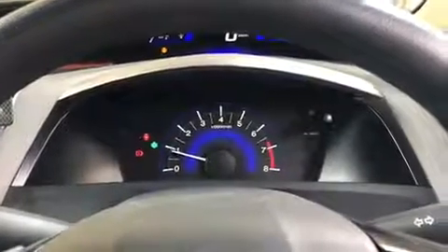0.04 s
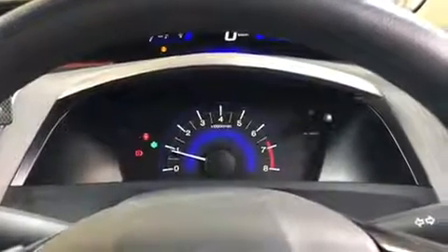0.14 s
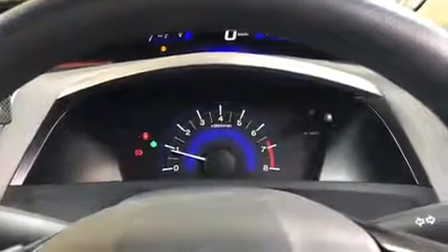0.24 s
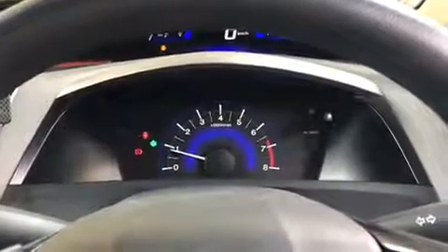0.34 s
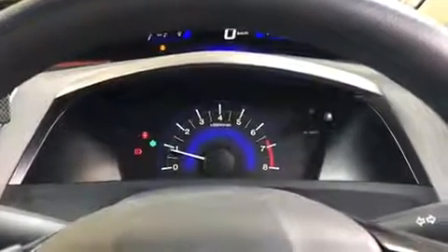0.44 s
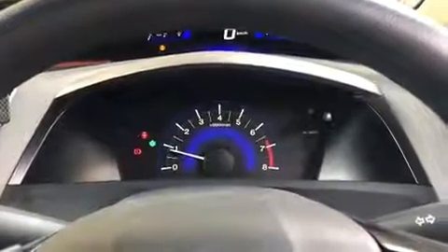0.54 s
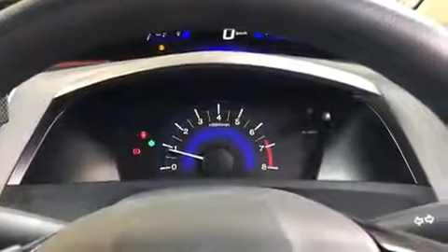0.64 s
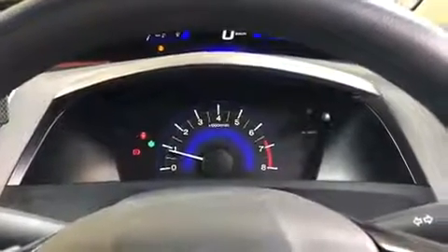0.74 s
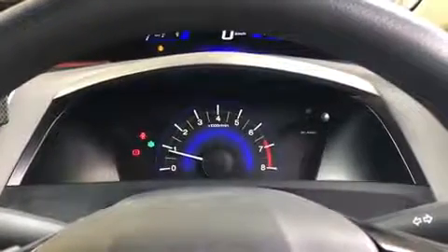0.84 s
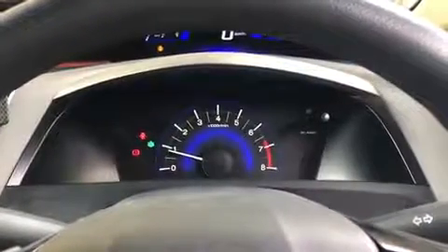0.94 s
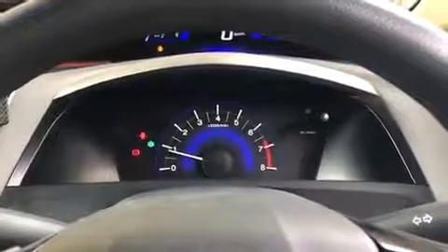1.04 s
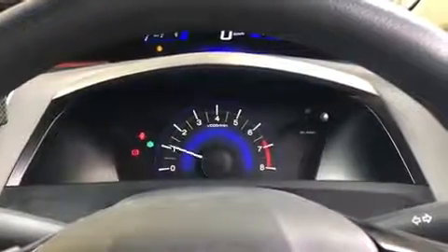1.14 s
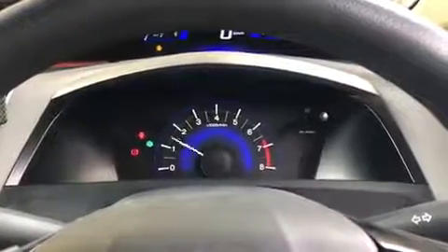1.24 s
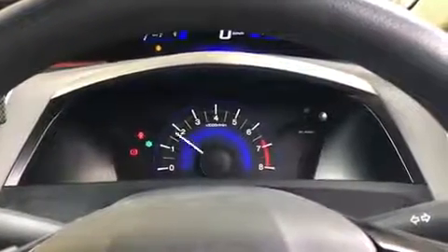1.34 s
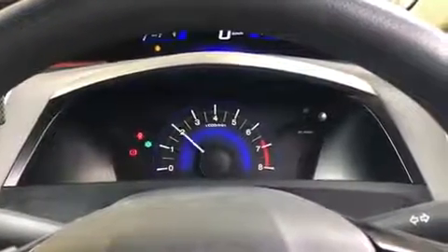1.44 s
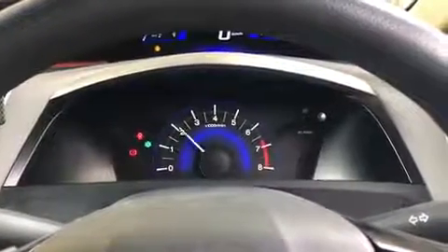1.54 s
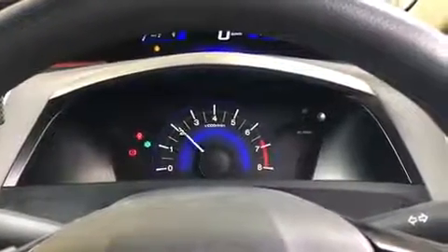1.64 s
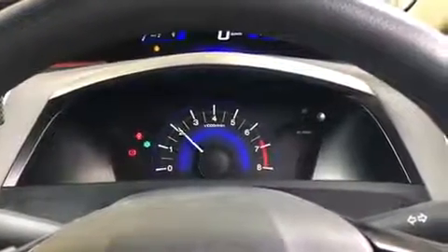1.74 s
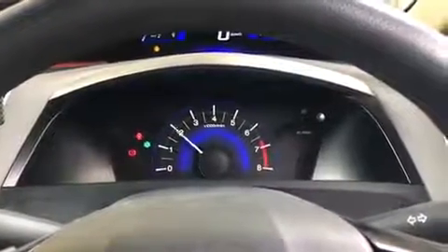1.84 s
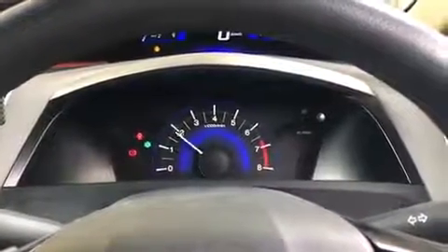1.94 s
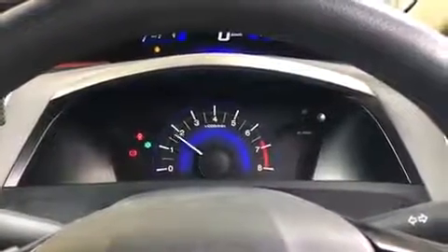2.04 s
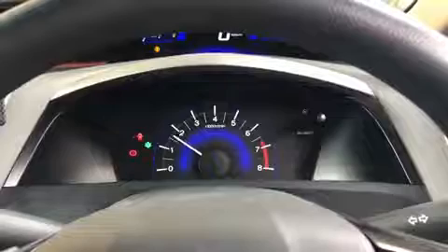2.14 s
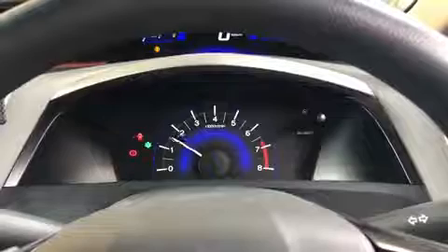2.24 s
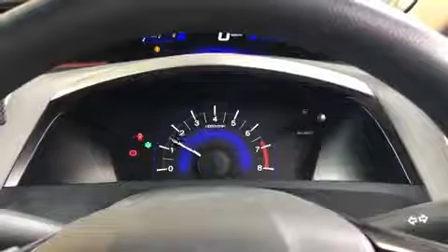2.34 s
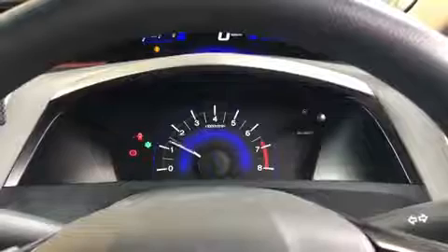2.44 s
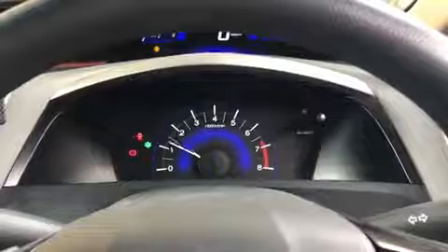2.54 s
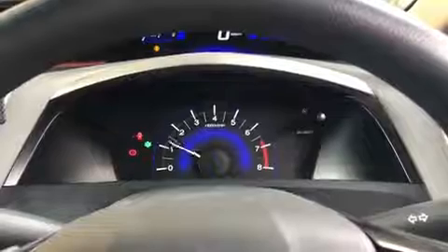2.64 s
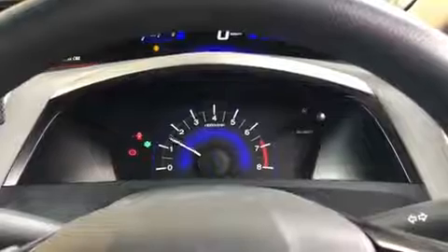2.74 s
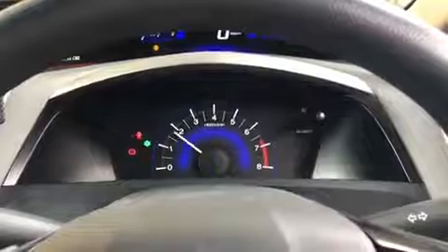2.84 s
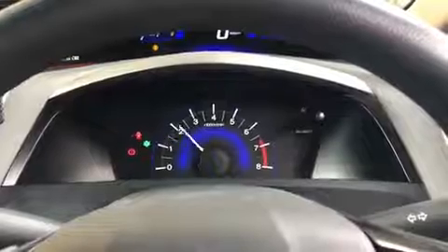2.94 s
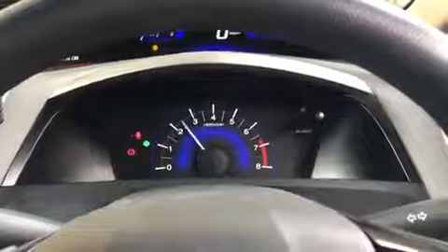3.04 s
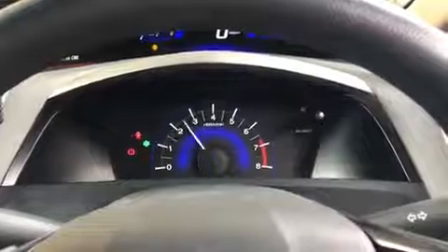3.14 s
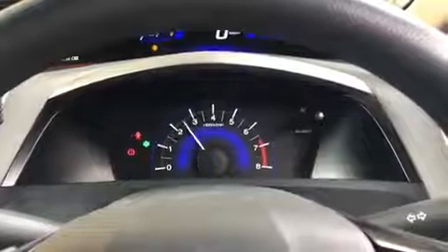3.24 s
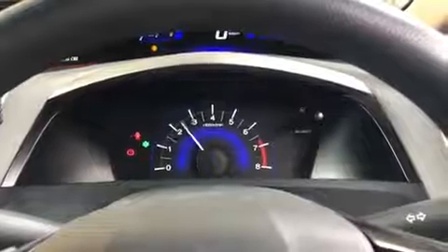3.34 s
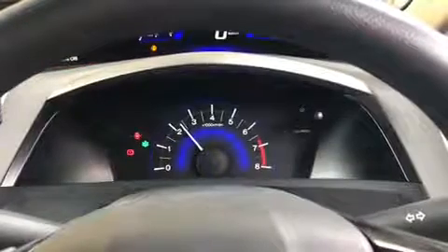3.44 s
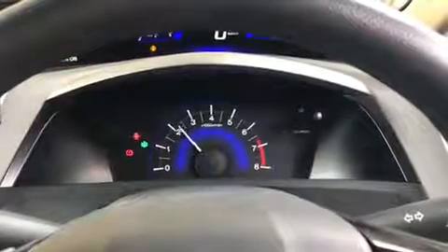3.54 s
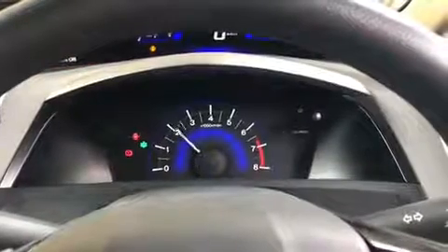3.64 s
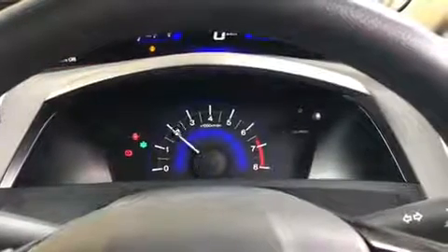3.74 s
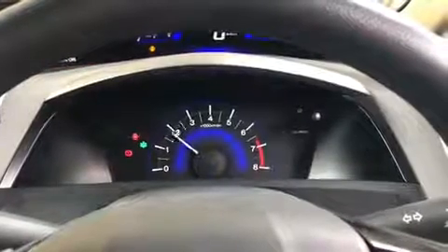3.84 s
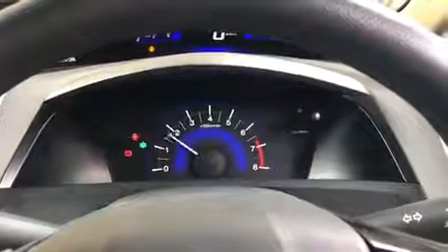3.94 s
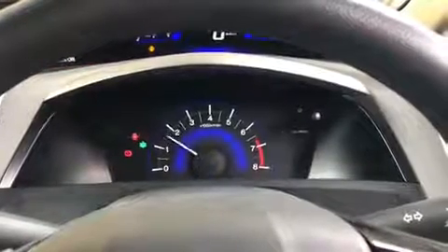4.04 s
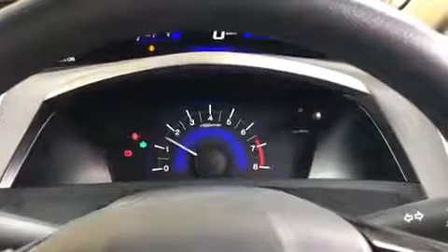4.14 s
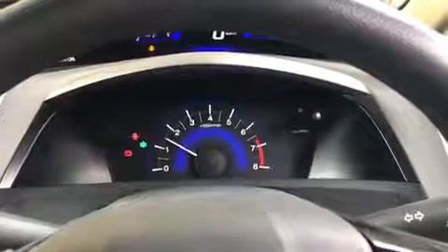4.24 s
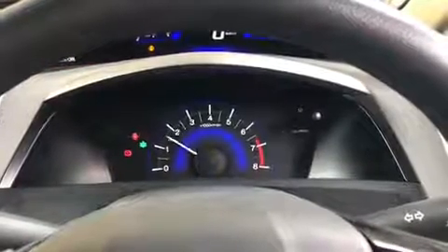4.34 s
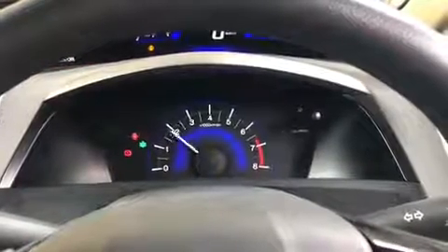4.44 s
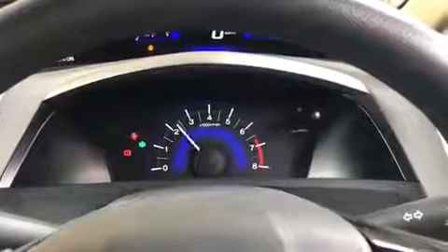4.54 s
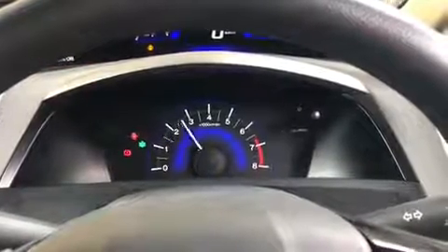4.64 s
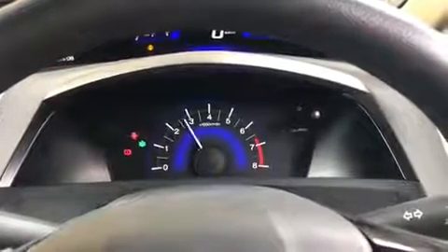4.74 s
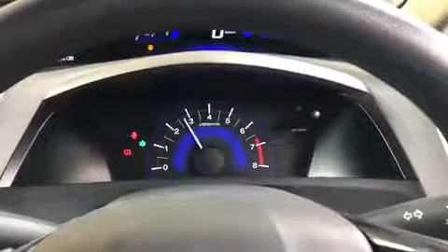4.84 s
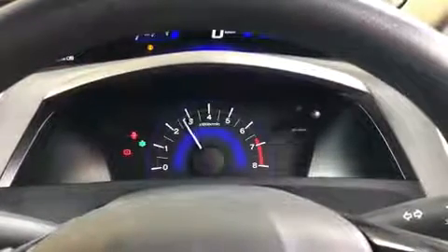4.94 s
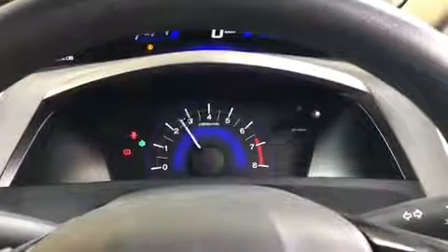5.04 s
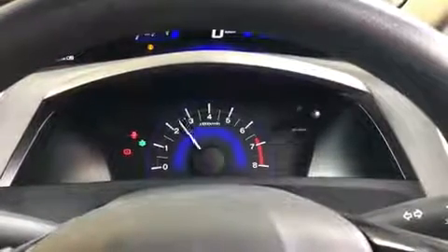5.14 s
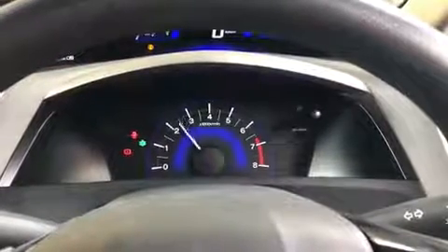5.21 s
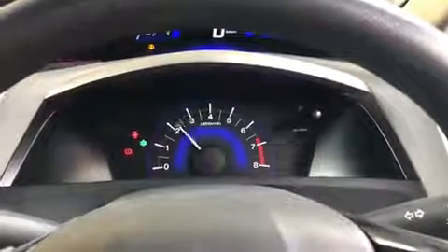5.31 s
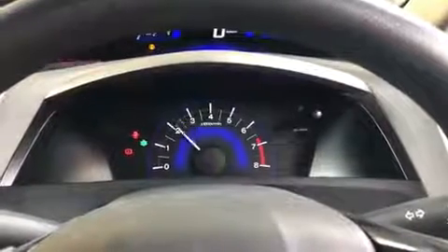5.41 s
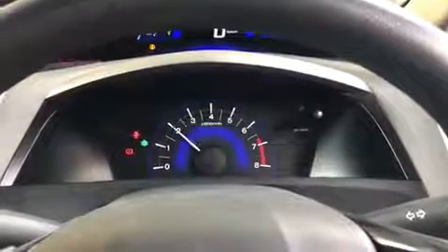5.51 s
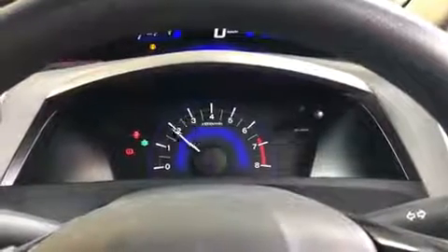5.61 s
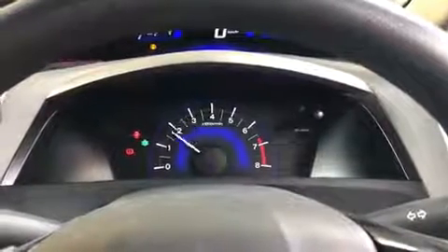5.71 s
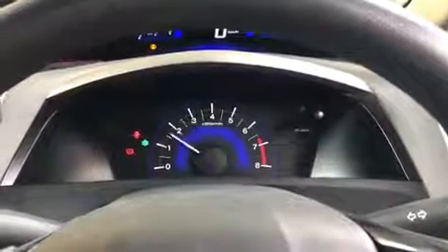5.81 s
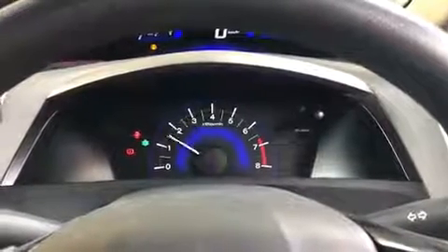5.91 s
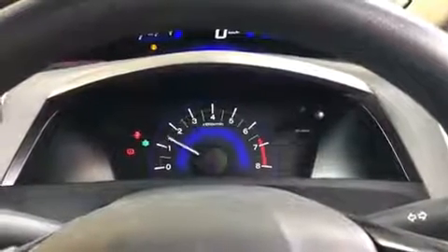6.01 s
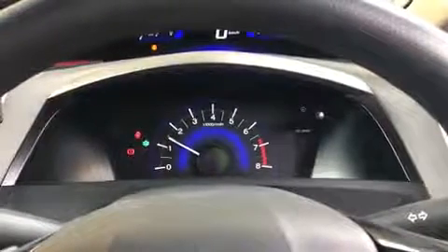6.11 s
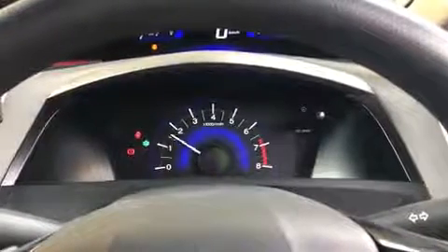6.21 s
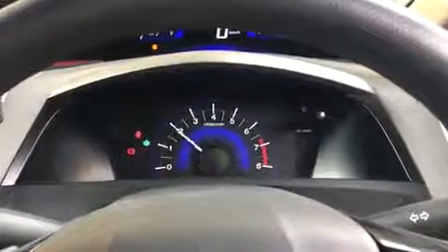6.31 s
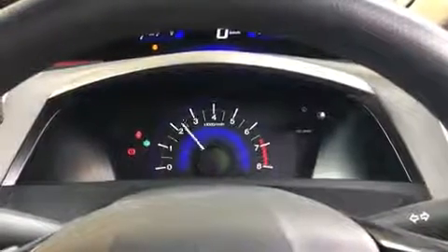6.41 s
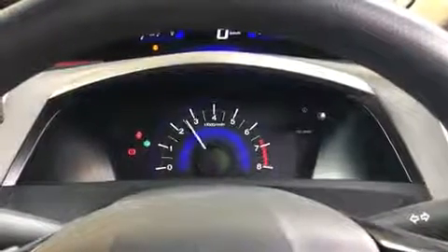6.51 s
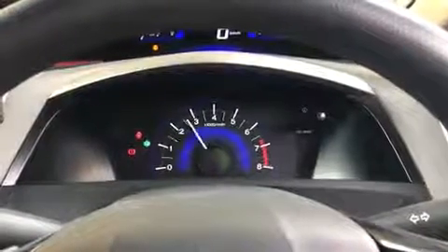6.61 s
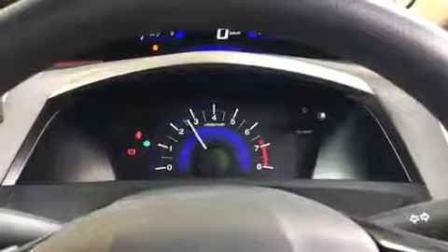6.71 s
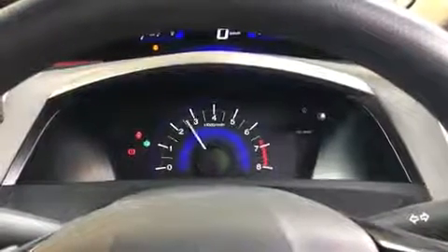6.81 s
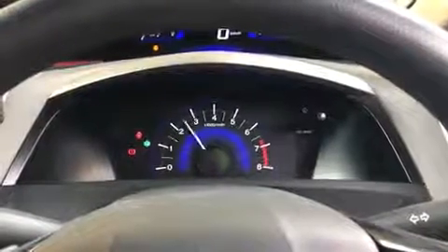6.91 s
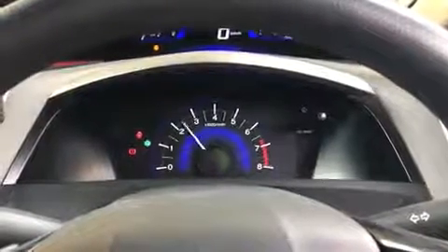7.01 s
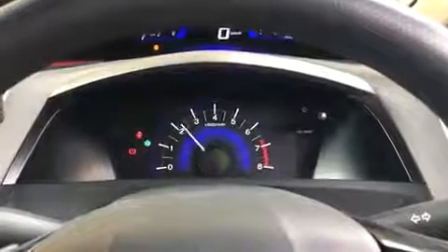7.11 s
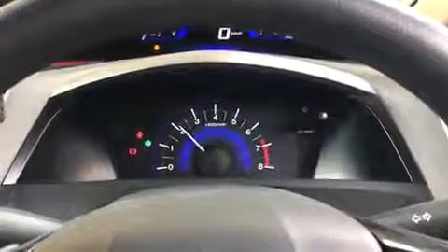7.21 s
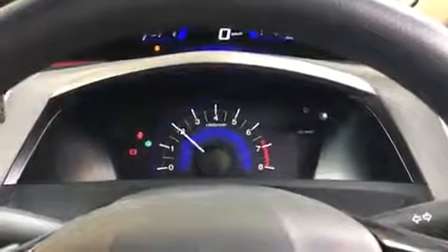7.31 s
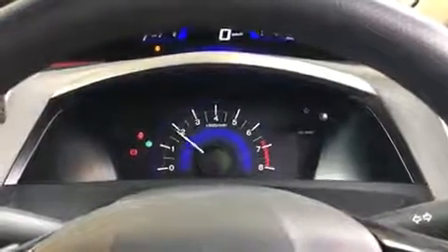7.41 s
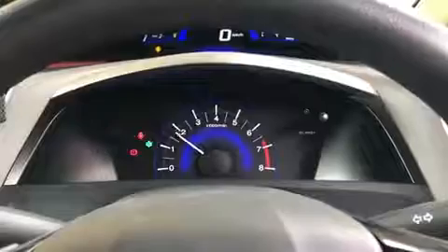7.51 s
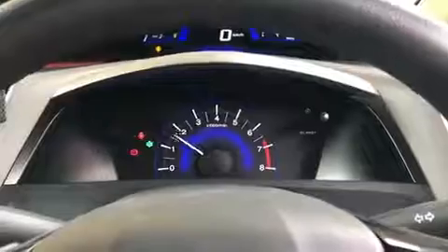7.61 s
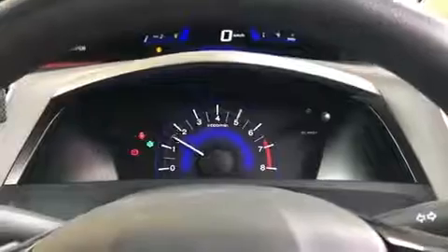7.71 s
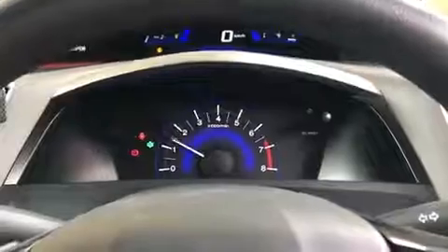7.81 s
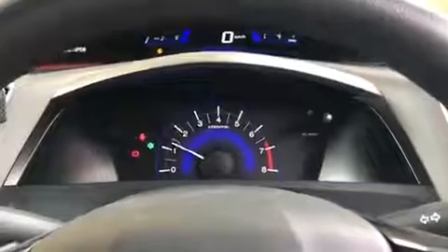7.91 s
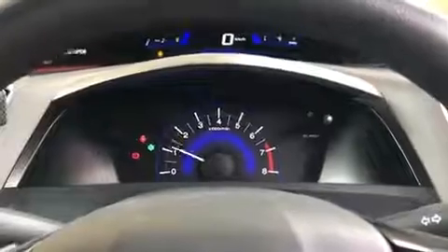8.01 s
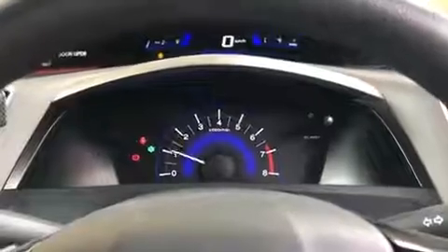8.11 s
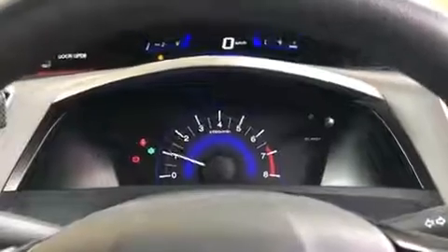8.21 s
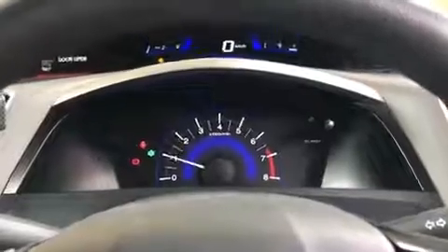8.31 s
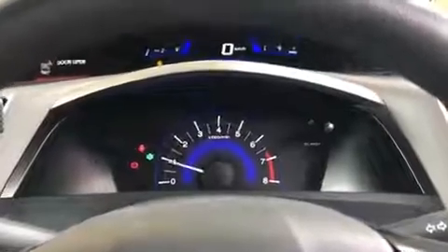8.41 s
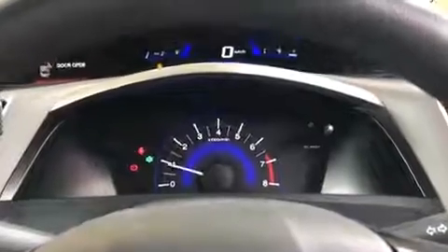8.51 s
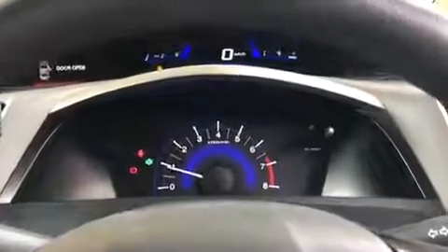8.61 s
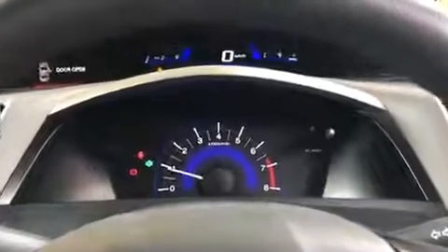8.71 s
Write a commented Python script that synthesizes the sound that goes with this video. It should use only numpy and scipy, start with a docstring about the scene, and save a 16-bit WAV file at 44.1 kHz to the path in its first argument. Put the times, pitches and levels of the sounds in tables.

```python
"""Petrol engine blipped, door open

Heard from the driver's seat of a four-cylinder car: the engine idles, is blipped four times and
sinks back each time; a fifth blip is just starting at the end. Low tones timed by the crankshaft boom
and drone in the cabin. Filtered firing pulses and noise rasp on the overrun, bark under load and
backfire once. Gas hisses in step, belts whirr, and nearby walls return a short tail."""
import sys
import numpy as np
from scipy import signal
from scipy.fft import rfft, irfft
from scipy.io import wavfile
from scipy.ndimage import uniform_filter1d

SR = 44100
rng = np.random.default_rng(int(sys.argv[2]) if len(sys.argv) > 2 else 0)


def wrap_up_sound(samples):
    """Save the sound to the file named by the first command line argument, as 16-bit audio."""
    columns = np.atleast_2d(samples).T
    # keep every value between -1 and 1, then stretch to whole-number steps
    tamed = np.clip(columns, -1, 1)
    steps = np.round(tamed * 32767).astype(np.int16)
    wavfile.write(sys.argv[1], SR, steps)


N = 386316
TIME = np.arange(N) / SR
FFT_SIZE = 2 ** 19  # longer than the scene


def amp(db):
    """Decibels to gain."""
    return np.exp(np.asarray(db) * (np.log(10) / 20))


def gain_at(colour, hz):
    """Gain of a colour at the given frequencies, read on a logarithmic pitch scale."""
    colour_hz, colour_db = np.transpose(colour)
    return amp(np.interp(np.log(hz + 1), np.log(colour_hz), colour_db))


def unit(x):
    """Scales to rms 1."""
    return x / np.sqrt(np.mean(x ** 2) + 1e-20)


def steady(x, size=4000):
    """Evens out slow changes of strength and keeps the single beats."""
    power = uniform_filter1d(uniform_filter1d(x ** 2, size), size)
    return x / np.sqrt(abs(power) + 1e-12)


def wander(rate_hz):
    """Smooth chance of rms 1, from noise low-passed at rate_hz."""
    hz = np.fft.rfftfreq(FFT_SIZE, 1 / SR)
    spectrum = rfft(rng.standard_normal(N), FFT_SIZE)
    return unit(irfft(spectrum / (1 + (hz / rate_hz) ** 4))[:N])


def ramp(start, length):
    """A smooth step from 0 to 1."""
    u = np.clip((TIME - start) / length, 0, 1)
    return u * u * (3 - 2 * u)


def at_speed(rows, fire_hz):
    """Each column of a table, read at the momentary firing rate."""
    hz, *columns = np.transpose(rows)
    return np.array([np.interp(fire_hz, hz, column) for column in columns])


def ring(x, colour, rings=(), size=8192):
    """Causal minimum-phase filter with a broad colour and narrow resonances on top."""
    hz = np.fft.rfftfreq(size, 1 / SR)
    low_skirt = np.minimum(hz / colour[0][0], 1) ** 2
    high_skirt = np.minimum(colour[-1][0] / (hz + 1), 1) ** 2
    peaks = sum(amp(db) / (1 + (2 * (hz - f) / width) ** 2) for f, width, db in rings)
    gain = gain_at(colour, hz) * low_skirt * high_skirt * (1 + peaks)
    # folding the cepstrum forward in time gives the minimum phase
    cepstrum = irfft(np.log(gain + 1e-5))
    cepstrum[1:size // 2] *= 2
    cepstrum[size // 2 + 1:] = 0
    response = irfft(np.exp(rfft(cepstrum)))[:size // 2]
    return signal.oaconvolve(x, response)[:N]


def disperse(x, spread):
    """A long, folded pipe smears each pulse over some milliseconds and keeps its spectrum."""
    hz = np.fft.rfftfreq(FFT_SIZE, 1 / SR)
    delay_s = spread * np.sin(2 * np.pi * hz / 310) / 2
    phase_turns = np.cumsum(delay_s) * hz[1]
    return irfft(rfft(x, FFT_SIZE) * np.exp(-2j * np.pi * phase_turns))[:N]


def puffs(turns, between, decay):
    """Turbulence that flares at each firing and decays until the next, over a constant floor."""
    flare = np.exp(-(turns % 1) / decay)
    return unit((between + flare) * rng.standard_normal(N))


def firings(turns, uneven, jitter):
    """One pulse a firing, strong and weak by turns, no two alike."""
    count = np.floor(turns)
    fired = np.diff(count, prepend=0) > 0
    alternation = 1 + uneven * np.cos(np.pi * count)
    chance = 1 + jitter * rng.standard_normal(N)
    return unit(fired * alternation * chance)


# blips of the throttle: start_s, pedal_travel_s, held_open_s, rise_to_top_speed_s,
# top_firing_hz, slowing_hz_per_s, rasp_trim_db, hiss_trim_db
THROTTLE_BLIPS = [(1.0, 0.21, 0.22, 0.45, 76.47, 40.23, -3.5, 0.5),
                  (2.56, 0.18, .21, 0.49, 88.94, 42.53, -2.5, 0.5),
                  (4.2, .05, 0.18, .44, 96.81, 42.37, 0, 0.5),
                  (6.055, 0.019, 0.18, .423, 95.7, 42.69, -1, 0),
                  (8.621, 0.25, 0.32, 0.53, 76, 40.85, -6, -4)]
# firing rate at idle, how gently the engine lands on it, how early it starts to pick up
IDLE_HZ, LANDING_HZ, LEAD_S = 28.1, 7.8, 0.072


def speed():
    """Firing rate: each blip swings it up, then friction slows it evenly until it lands on idle."""
    fire_hz = np.full(N, IDLE_HZ)
    for start, _, _, rise, top_hz, slowing, *_ in THROTTLE_BLIPS:
        above_idle_hz = top_hz - IDLE_HZ - slowing * (TIME - start - rise)
        coast_hz = IDLE_HZ + LANDING_HZ * np.logaddexp(0, above_idle_hz / LANDING_HZ)
        fire_hz = fire_hz + (coast_hz - fire_hz) * ramp(start - LEAD_S, rise + LEAD_S)
    return fire_hz


LULL_LAG_S, LULL_FALL_S, LULL_RECOVER_S = 0.02, 0.15, 0.088


def lull():
    """Goes from 0 to 1 and back as the engine tops out after each blip."""
    tops = [start + rise + LULL_LAG_S for start, _, _, rise, *_ in THROTTLE_BLIPS]
    return sum(ramp(top - LULL_FALL_S, LULL_FALL_S) - ramp(top, LULL_RECOVER_S) for top in tops)


# base levels, throttle shut: firing_hz, drone_db, rasp_db, hiss_db
SHUT_LEVELS = [(28.1, -32.5, -70, -62), (29.1, -35.5, -54, -56), (34, -34, -52, -56), (38.3, -29, -43, -56),
               (47.3, -30, -45.5, -54), (51.2, -25.5, -42, -51.5), (62.5, -25.5, -38.5, -47),
               (67.7, -16, -30, -47), (72.2, -28, -30, -42.5), (78.5, -32.5, -32.5, -45),
               (89.7, -40.5, -31.5, -44.5), (99, -34, -36, -43.5)]
SHUT_FIZZ_DB = -56.5
# base levels, throttle open: firing_hz, drone_db, rasp_db, hiss_db, fizz_db
OPEN_LEVELS = [(33, -17.5, -42, -46, -60), (42.7, -13.5, -29, -32.5, -50), (49.7, -11.5, -20.5, -34, -45.5),
               (62.4, -11.5, -18, -38.5, -32.5), (66.7, -17.5, -41, -31.5, -37),
               (82.8, -12.5, -21, -33, -37.5), (94.95, -17, -26.5, -33.5, -36.5)]
# fall once the throttle shuts, db_per_s: drone, rasp, hiss, fizz
RELEASE_RATES = [146, 35.3, 62.3, 83]
# change with the pedal only starting down: drone_db, rasp_db, hiss_db, fizz_db
PART_THROTTLE = [-4, -5, -1, 4]
# change at the depth of the lull: drone_db, rasp_db, hiss_db, fizz_db
LULL_CHANGE = [1, -4.5, -7, -3]
# exhaust surges while coasting: start_s, length_s, drone_db, rasp_db, hiss_db, fizz_db
COASTING_SURGES = [(1.498, 0.12, -17, -34, -67, -65), (3.038, 0.076, -31, -33.5, -40, -48.5),
                   (4.703, 0.34, -51, -42, -38, -42.5), (6.555, .28, -48, -38, -38, -44),
                   (7.773, 0.23, -26, -42, -67, -75)]
ATTACK_S, HISS_ATTACK_S, SURGE_EDGE_S = 0.018, 0.038, 0.077
UNEVEN_DB = 1.0  # the level wavers, since combustion is never quite even


def levels(fire_hz):
    """Drone, rasp, hiss and fizz in dB: coasting, plus each blip's attack, hold and release, plus surges."""
    shut_db = np.vstack([at_speed(SHUT_LEVELS, fire_hz), np.full(N, SHUT_FIZZ_DB)])
    coasting = amp(shut_db)
    pulling = amp(at_speed(OPEN_LEVELS, fire_hz))
    throttle, trim_db = np.zeros((4, N)), np.zeros((4, N))
    for start, travel, held, _, _, _, rasp_db, hiss_db in THROTTLE_BLIPS:
        attack_times = (ATTACK_S, ATTACK_S, HISS_ATTACK_S, HISS_ATTACK_S)
        attack = np.array([ramp(start, length) for length in attack_times])
        pedal_db = np.outer(PART_THROTTLE, 1 - ramp(start, travel))
        released_db = np.outer(RELEASE_RATES, np.clip(TIME - start - held, 0, 2))
        throttle += attack * amp(pedal_db - released_db)
        trim_db[1:3, TIME > start] = [[rasp_db], [hiss_db]]  # holds until the next blip
    lull_db = np.outer(LULL_CHANGE, lull())
    power = (coasting ** 2 + (throttle * pulling) ** 2) * amp(trim_db + lull_db) ** 2
    for start, length, *surge_db in COASTING_SURGES:
        rising = ramp(start - SURGE_EDGE_S / 2, SURGE_EDGE_S)
        falling = ramp(start + length - SURGE_EDGE_S / 2, SURGE_EDGE_S)
        power += np.outer(amp(surge_db), rising - falling) ** 2
    return 10 * np.log10(power) + UNEVEN_DB * wander(9.3)


def surroundings(x, wet_db, t60):
    """Nearby walls return a short tail through the open door: decaying noise, 60 dB down after t60 s."""
    t = TIME[:SR // 2]
    taps = rng.standard_normal(len(t)) * (t > 0.006) * amp(-60 * t / t60)
    tail = signal.oaconvolve(x, taps / np.linalg.norm(taps))[:N]
    return x + amp(wet_db) * ring(tail, [(300, -13.0), (1200, 13.5), (6000, 6.0), (14000, 10.5)])


# colour of the engine bay's whirr: pitch_hz, level_db
BAY_COLOUR = [(160, -50), (280, 1), (348, -1), (406, -11.5), (492, -1), (771, -12), (1090, -4.5),
              (1360, -10.5), (1540, -9.5), (2290, -14), (2710, -15), (4190, -21.5), (6000, -32),
              (7800, -70), (13200, -120)]


def engine_bay(turns, whirr_db, rumble_db):
    """Belts, fan and valves whirr steadily; the body shell rumbles at its lowest resonance."""
    whirr = unit(ring(puffs(2 * turns, between=10.0, decay=0.12), BAY_COLOUR))
    whirr = whirr * amp(0.9 * wander(5.8))
    shell = [(32, -30), (47, 0), (60, -15), (90, -13), (130, -30)]  # Hz, dB
    rumble = steady(ring(rng.standard_normal(N), shell), size=8000)
    swell_db = np.interp(TIME, [7.4, 8.1], [0, 2.5])  # the whirr grows as the engine settles
    return amp(whirr_db + swell_db) * whirr + amp(rumble_db) * rumble


# the whistle's harmonics, lowest first, before its flutter and 1.5 dB cut: level_db
WHISTLE_HARMONICS = [-48.5, -51, -42.5, -48, -52]


def whistle(start=0.981, length=0.066, pitch_hz=2492):
    """The throttle plate whistles thinly and briefly as it first cracks open: fluttering harmonics."""
    is_on = (TIME > start) & (TIME < start + length)
    gate = uniform_filter1d(1.0 * is_on, 200) * amp(4.7 * wander(60) - 1.5)
    phase = 2 * np.pi * pitch_hz * TIME
    tone = sum(amp(db) * np.sin(k * phase) for k, db in enumerate(WHISTLE_HARMONICS, 1))
    return gate * np.sqrt(2) * tone


# colours of rushing gas, broad hiss and higher fizz: pitch_hz, level_db
HISS_COLOUR = [(1200, -26), (2600, -5.5), (3500, 4), (4600, 2), (6000, 5), (7000, -2), (8500, -28),
               (12000, -48)]
FIZZ_COLOUR = [(5000, 1), (8000, 3.5), (9500, 3.5), (10400, -0.5), (11500, 3.5), (14000, 0)]
# narrow rings of the exhaust, heard in gas, pops and barks: pitch_hz, width_hz, level_db
EXHAUST_RINGS = [(522, 70, -6), (1350, 90, -12), (1830, 45, -7), (2550, 45, -1), (3980, 55, 0),
                 (5190, 55, 0)]


def gas(turns, hiss_db, fizz_db):
    """Gas rushes out in step with the firings: pulsing noise in two colours."""
    hiss = unit(ring(puffs(turns, between=1.3, decay=0.39), HISS_COLOUR, EXHAUST_RINGS))
    fizz = unit(ring(puffs(turns, between=1.0, decay=0.58), FIZZ_COLOUR))
    return amp(hiss_db - 3.0) * hiss + amp(fizz_db - 1.0) * fizz


# unburnt fuel popping in the pipe: start_s, level_db, length_s
PIPE_POPS = [(1.872, -18.5, .036), (2.287, -39, .015), (3.875, -40, .015), (3.965, -40, .015),
             (7.87, -42, .015)]
# colour of the tearing exhaust, in pops and barks: pitch_hz, level_db
BLAST_COLOUR = [(150, -25), (350, -6), (540, 2), (680, -1), (830, -9), (1050, -10), (1180, -3), (1380, -2),
                (1520, -11), (2000, -19), (2600, -17), (3100, -20), (6200, -17), (9000, -24), (14000, -28)]


def pops(thump_db, spray_db, spray_lag=0.029, spray_decay=0.039):
    """A ragged burst in the pipe thumps the cabin; a spray of gas follows a strong one out."""
    burst, spray = np.zeros(N), np.zeros(N)
    for start, db, length in PIPE_POPS:
        age = np.maximum(TIME - start, 0)
        burst += amp(db) * (age > 0) * np.exp(-(age / length) ** 2)
        is_strong = db > -30
        spray += amp(db) * is_strong * (age > 0) * np.exp(-abs(age - spray_lag) / spray_decay)
    crack = steady(ring(rng.standard_normal(N), BLAST_COLOUR, EXHAUST_RINGS), size=400)
    # the cabin's main resonance
    thump = np.sqrt(2) * np.sin(2 * np.pi * 197 * TIME + 1.2 * wander(35))
    jet_colour = [(1500, -35), (4000, 3), (6300, 8), (9000, -3), (14000, -3)]  # Hz, dB
    jet = unit(ring(rng.standard_normal(N), jet_colour))
    thumping = amp(thump_db) * uniform_filter1d(burst, 500) * thump
    return burst * crack + thumping + amp(spray_db) * spray * jet


# the cabin's standing waves, throttle shut: firing_hz, firing_tone_db, octave_db
BOOM_SHUT = [(28.1, -62, -36), (30.4, -55, -38), (35, -40, -29), (39, -26.5, -40), (46.8, -16, -32.5),
             (52.2, -22, -32), (55.6, -20.5, -26.5), (59.4, -27, -35.5), (61.7, -24, -29),
             (72.3, -23.5, -24), (80.4, -24.5, -35.5), (85, -23.5, -27), (88.58, -23.5, -27.5)]
# and while gaining speed: firing_hz, firing_tone_db, octave_db
BOOM_OPEN = [(33.5, -45, -31), (46.4, -20.5, -21.5), (51, -15.5, -24), (61.5, -18.5, -51),
             (66.3, -31.5, -24.5), (79, -28, -25), (89, -35.5, -15), (94.5, -29, -20)]


def boom(turns, fire_hz, handover_s=0.097, lull_db=-3):
    """The firing tone and its octave sweep through standing waves, wavering, and change while gaining speed."""
    pull = sum(ramp(start, ATTACK_S) - ramp(start + rise - handover_s, handover_s)
               for start, _, _, rise, *_ in THROTTLE_BLIPS)
    tones_db = pull * at_speed(BOOM_OPEN, fire_hz) + (1 - pull) * at_speed(BOOM_SHUT, fire_hz)
    tones_db = tones_db + lull_db * lull()
    tones = sum(amp(db + 1.54 * wander(8.4)) * np.sin(2 * np.pi * k * turns)
                for k, db in enumerate(tones_db, 1))
    return np.sqrt(2) * tones


# colour of the cabin's resonances: pitch_hz, level_db
CABIN_COLOUR = [(30, -44), (46, 11), (62, -44), (92, -3.5), (115, -3), (145, -4), (180, -2.5), (208, 9.5),
                (228, -1.5), (255, -12), (310, -16.5), (360, -19), (430, -57)]


def drone(turns, fire_hz, idle_half_db, half_db, rough_db, count=20):
    """Higher crankshaft orders sweep through the cabin's resonances; uneven firing at idle makes them throb."""
    uneven_db = np.interp(fire_hz, [30, 45], [idle_half_db, half_db])
    tone = np.zeros(N)
    for k in range(5, count):  # in halves of the firing rate; the odd ones come from uneven firing
        hz = k * fire_hz / 2
        # the main resonance holds each beat back and stretches it
        lag = 4 * np.arctan((hz - 205) / 22)
        gain = amp(uneven_db * (k % 2)) * gain_at(CABIN_COLOUR, hz)
        tone += gain * np.cos(np.pi * k * turns - lag)
    burble = ring(puffs(turns, between=0.49, decay=0.74), CABIN_COLOUR)
    return steady(steady(tone) + amp(rough_db) * unit(burble))


# bursts of full load, before scene() adds 1 dB: top_s, level_db, half_length_s
LOAD_BURSTS = [(1.21, -22, 0.029), (2.751, -20, 0.038), (4.326, -20.5, 0.054), (6.183, -19.5, 0.043)]


def barks(turns):
    """Under full load the pulses steepen into a bright, tearing blast: sharp pulses and noise, ringing."""
    load = sum(amp(db) * np.exp(-abs((TIME - top) / half) ** 5.2) for top, db, half in LOAD_BURSTS)
    pulses = disperse(firings(turns, uneven=0.1, jitter=0.12), spread=0.009)
    drive = pulses + puffs(turns, between=0.5, decay=0.4)
    return load * steady(ring(drive, BLAST_COLOUR, EXHAUST_RINGS))


# colour of the tailpipe: pitch_hz, level_db
PIPE_COLOUR = [(250, -44.5), (350, -4.5), (400, -9.5), (470, 4), (520, 4.5), (620, -2), (700, -13),
               (800, -20), (1020, -27), (1170, -14), (1400, -8.5), (1520, -39), (2500, -27), (4000, -26.5)]


def rasp(turns, fire_hz):
    """Exhaust pulses ring the tailpipe; at low speed they melt into soft turbulence."""
    sharp = np.interp(fire_hz, [45, 66], [0.15, 1])
    pulses = sharp * firings(turns, uneven=0.38, jitter=0.13)
    drive = pulses + amp(-10) * puffs(turns, between=0.8, decay=0.35)
    return steady(ring(disperse(drive, spread=0.024), PIPE_COLOUR))


def scene():
    """The crankshaft's turning times the engine's sources; speed and throttle set their levels."""
    fire_hz = speed()
    drone_db, rasp_db, hiss_db, fizz_db = levels(fire_hz)
    unsteady = np.interp(fire_hz, [30, 45], [0.012, 0.004])  # the idle runs less evenly
    turns = np.cumsum(fire_hz * (1 + unsteady * wander(12))) / SR  # one turn is one firing
    bay = engine_bay(turns, whirr_db=-42.5, rumble_db=-32)
    cabin = drone(turns, fire_hz, idle_half_db=-5, half_db=-10, rough_db=-7)
    low = boom(turns, fire_hz) + amp(drone_db) * cabin
    pipe = amp(rasp_db) * rasp(turns, fire_hz) + amp(1.0) * barks(turns)
    pipe = pipe + pops(thump_db=6.5, spray_db=-7)
    through_door = pipe + gas(turns, hiss_db, fizz_db) + whistle()
    outside = surroundings(through_door, wet_db=-11, t60=0.14)
    return (low + outside + bay)[None]


EDGE_HZ = 14050  # upper band limit


def record(dry, ceiling=0.66):
    """The microphone rounds off the highest peaks; then the band limit."""
    rounded = dry / (1 + (dry / ceiling) ** 8) ** (1 / 8)
    low_pass = signal.firwin(511, EDGE_HZ, window=("kaiser", 9), fs=SR)
    return signal.oaconvolve(rounded, low_pass[None], "same")


dry = scene()
out = record(dry)
wrap_up_sound(out)
```